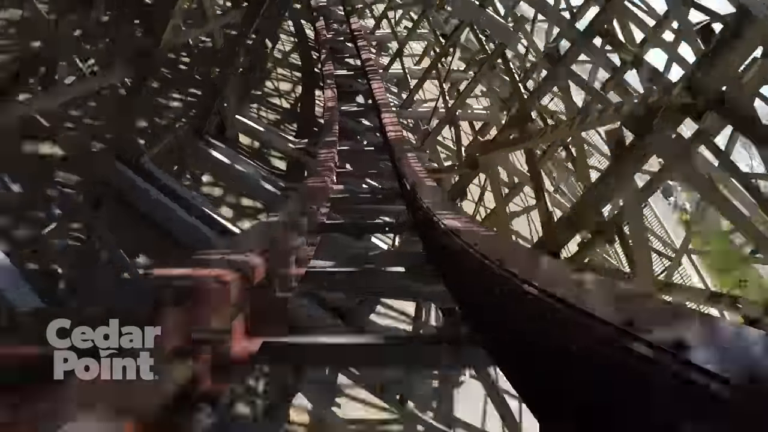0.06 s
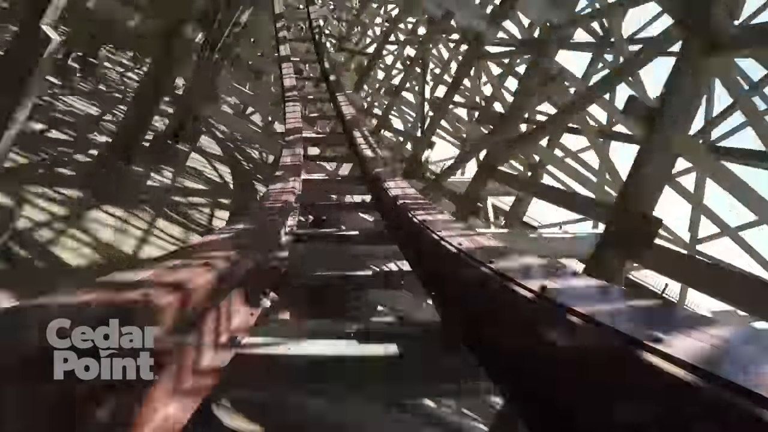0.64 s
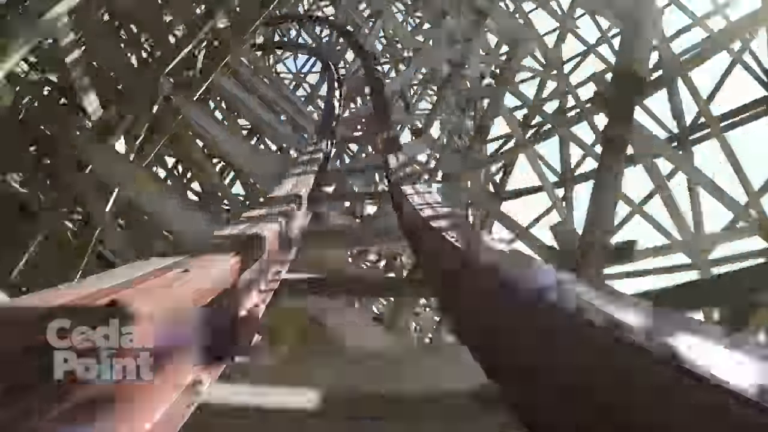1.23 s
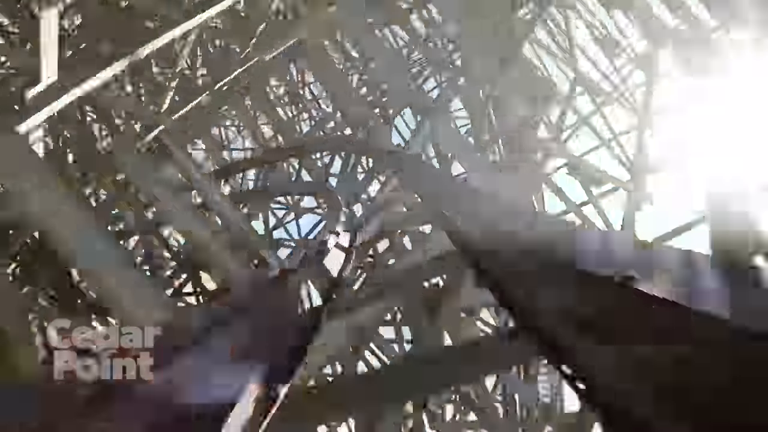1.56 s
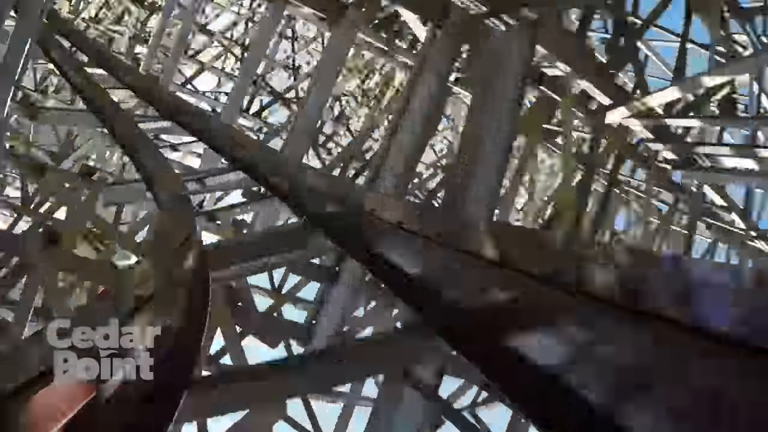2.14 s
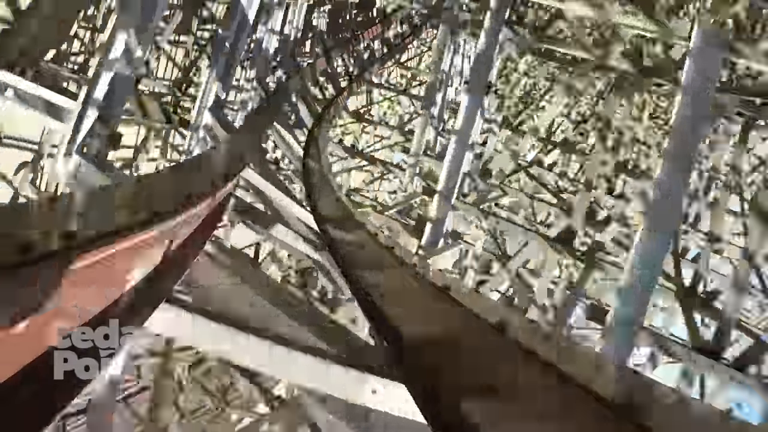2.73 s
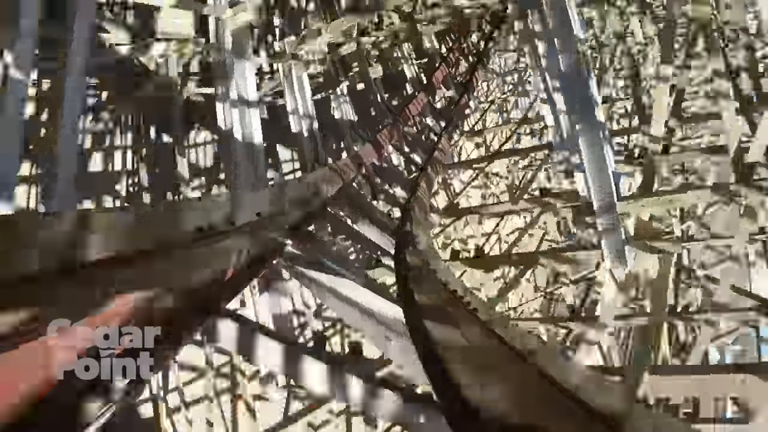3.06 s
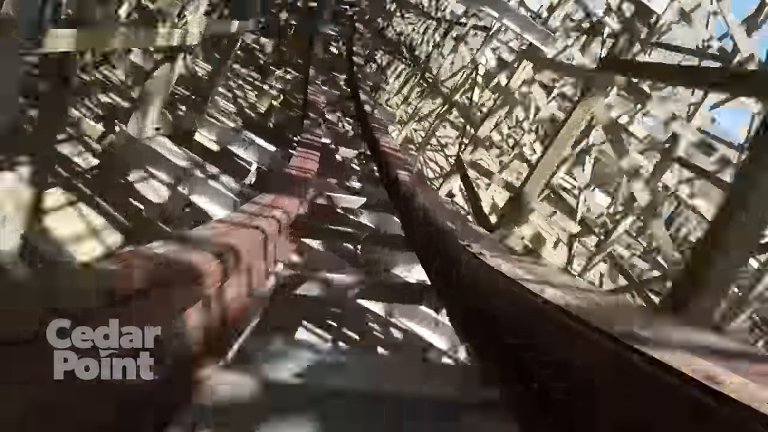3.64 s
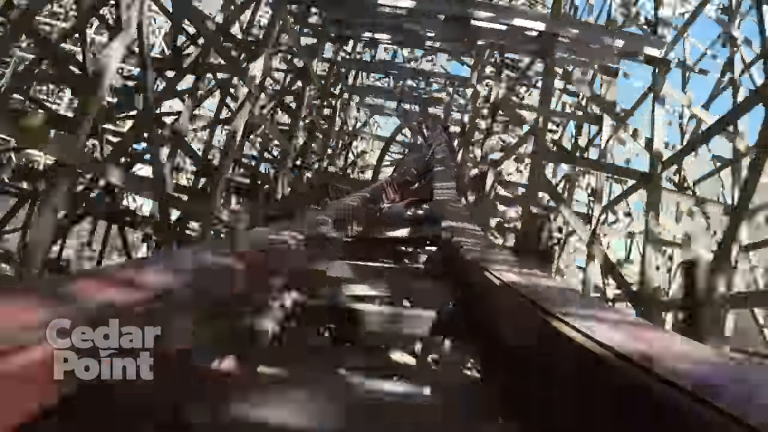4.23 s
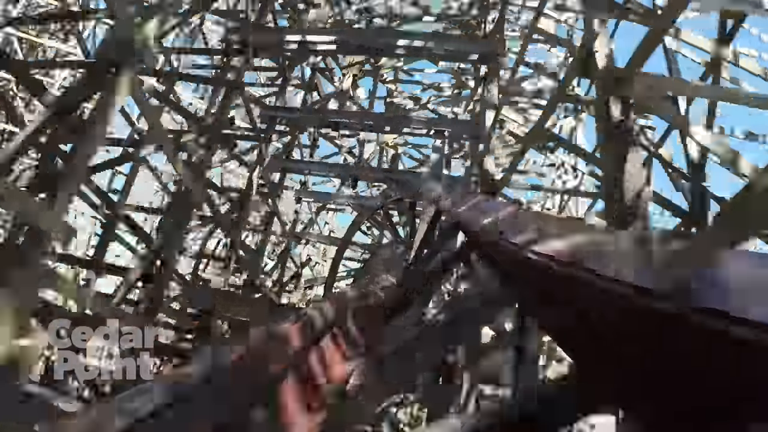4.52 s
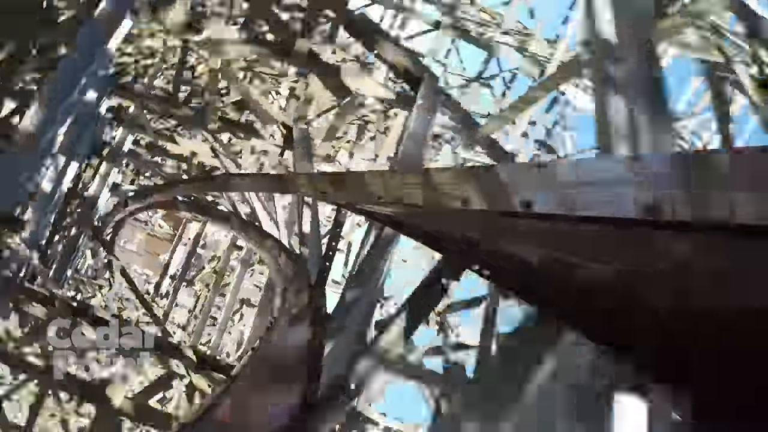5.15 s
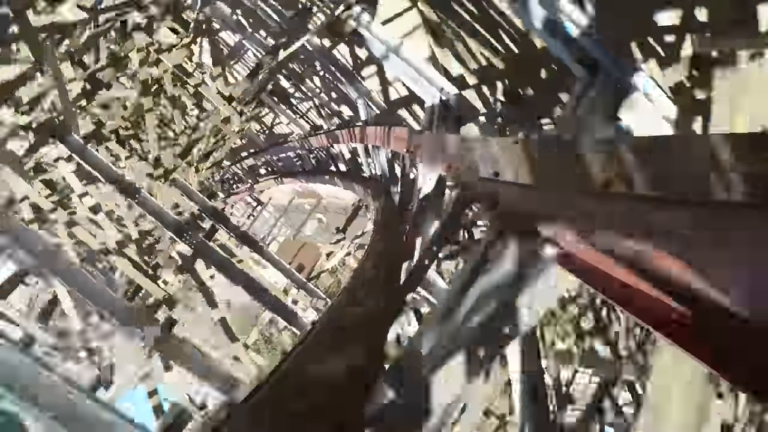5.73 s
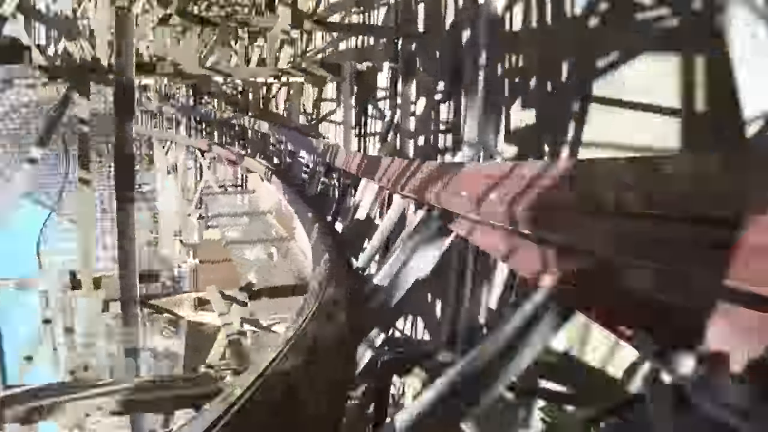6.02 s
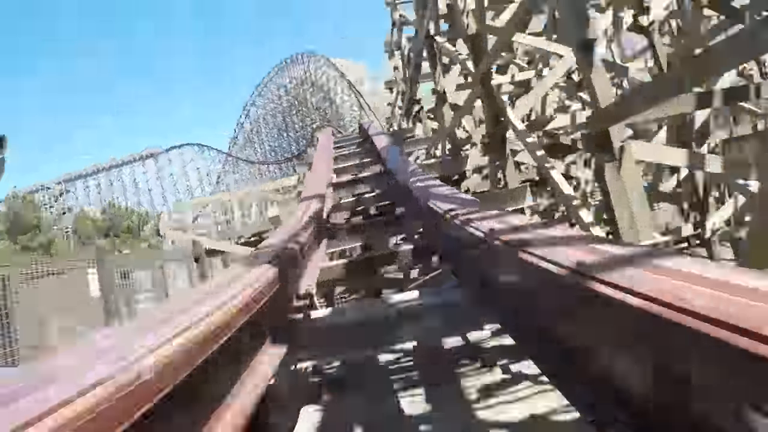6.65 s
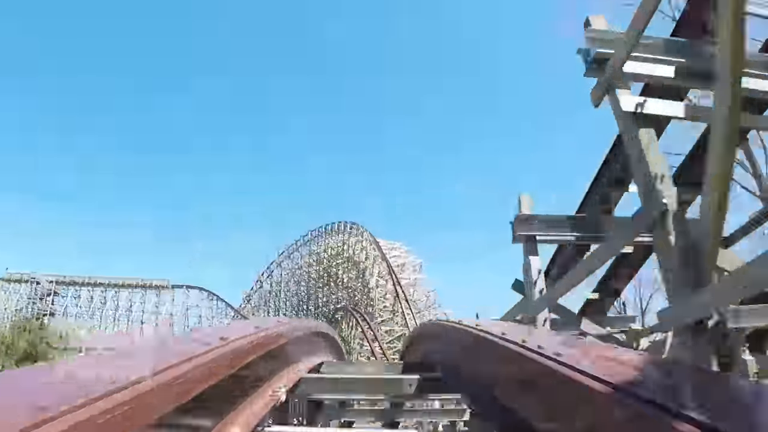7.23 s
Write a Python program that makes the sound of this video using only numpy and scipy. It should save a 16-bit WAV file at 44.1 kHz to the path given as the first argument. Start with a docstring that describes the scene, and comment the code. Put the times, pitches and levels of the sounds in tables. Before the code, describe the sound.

A roller coaster runs fast on steel rails outdoors, heard from the front car. A deep rumble, a rolling wheel roar and low wind buffeting continue at a fairly even level for all seven seconds or so, with a faint steel hiss above them. In the first second and a half, low bumps come in quick succession and loose fittings chatter lightly. Wind thumps the microphone between about 1.8 and 3 seconds, and again near 5 and 5.5. The car rattles and the wheels clack irregularly, with a strong jolt at 2.5 and more around 3.9, 4.6 and 5 seconds. Very short, rough squeaks and scrapes are scattered throughout. Knocks and a brief surge of roar come near 5.6, then a double clunk at 6.2. At 6.8 a hard clank rings with short, clean pings, and the roar eases slightly as the ride rolls on.

```python
"""A deep rumble and buffeting wind: a roller coaster on steel rails in a timber frame, from its front car.
Rail roughness drives the wheels, which roar through the chassis and hiss as they slide. Rough spots of
track set the car body rattling, bumps clunk, wheels clack and loose fittings chatter. The flanges give
short, rough squeaks, and near the end a hard clank rings with clean pings.
Eddies strike the microphone; a limiter holds the peaks."""
import sys
import numpy as np
from scipy import signal
from scipy.fft import rfft, irfft, next_fast_len
from scipy.io import wavfile
from scipy.ndimage import uniform_filter1d, minimum_filter1d, map_coordinates

SR = 44100
rng = np.random.default_rng(int(sys.argv[2]) if len(sys.argv) > 2 else 0)


def waveform_to_disk(signal):
    """Save audio, clipped to [-1, 1], as 16-bit WAV at the path in sys.argv[1]."""
    frames = np.transpose(np.atleast_2d(signal))
    scaled = np.clip(frames, -1, 1) * 32767
    samples = np.round(scaled).astype(np.int16)
    wavfile.write(sys.argv[1], SR, samples)


N = 321048

# modes of the car body: (frequency [Hz], bandwidth [Hz], level [dB])
BODY_MODES = [(540, 110, -9.5), (656.5, 57, 3), (751.5, 75, 0.5), (797.4, 43, 2.5), (1340, 260, -20.5),
              (1780, 270, -27.5), (2570, 130, -27), (3020, 170, -30.5)]
# modes of the steel wheels: (frequency [Hz], bandwidth [Hz], level [dB])
WHEEL_MODES = [(2520, 48, 0.5), (3070, 48, 2.5), (3430, 49, -8.5), (3820, 37, -4), (5000, 90, -9.5),
               (5504, 42, -12), (6140, 80, -16.5), (7496, 60, -23.5)]


def wheels(load_db, roar_db, shake):
    """Forced vibration: rail roughness drives a rumble and roar in the chassis and a body clatter."""
    # spectra of the chassis vibration: (frequency [Hz], level [dB])
    rumble_spectrum = [(50, -40), (100, -9.5), (150, -3.5), (240, 0), (340, -3), (520, -4.5), (700, -11.5),
                       (1000, -15.5), (3000, -79.5)]
    roar_spectrum = [(200, -26.5), (500, -5.5), (820, 4), (930, 0.5), (1150, 0.5), (1500, 1), (1850, -4),
                     (2150, -11), (2700, -20), (3600, -42.5), (7000, -67.5)]
    rumble = amp(load_db + 1.0 + 0.22 * wobble(16)) * coloured(turbulence(patchy_db=1), rumble_spectrum)
    roar_gain = amp(roar_db + 1.39 + 0.85 * shake + 0.52 * wobble(14))
    roar = roar_gain * coloured(turbulence(patchy_db=0.8), roar_spectrum)
    body_ring = resonate(impacts(rate=1400, spread_db=5), BODY_MODES)
    clatter = amp(roar_db + 0.5 + 1.5 * shake) * unit(soften(body_ring, corner_hz=2510))
    return rumble + roar + clatter


def boom(load_db, mean_db=-20, growth=0.65):
    """Mass-spring resonance: the chassis booms on its suspension, a little louder under load."""
    # spectrum of the sprung chassis: (frequency [Hz], level [dB])
    boom_spectrum = [(50, -29.5), (85, -5.5), (110, -3), (135, 0), (170, -1), (210, -8.5), (400, -46),
                     (1000, -100)]
    level_db = mean_db + growth * (load_db - load_db.mean())
    return amp(level_db + 0.62 * wobble(18)) * coloured(rng.standard_normal(N), boom_spectrum)


def wind(roar_db, air_db=-73.0, air_growth=.6):
    """Turbulent pressure: eddies flutter on the microphone, and a faint hiss of air follows the roar."""
    # strength of the gusts: (time [s], level [dB])
    gusts = [(0.0, -20), (0.1, -17.5), (2.13, -15), (2.41, -18.5), (2.84, -15.5), (5.76, -19),
             (5.92, -14.5), (6.47, -21.5), (6.51, -12), (6.57, -19.5), (6.69, -14.5), (7.12, -17.5),
             (7.14, -15), (7.28, -21)]
    # spectra of the buffeting and of the passing air: (frequency [Hz], level [dB])
    buffet_spectrum = [(5, -51.5), (14, -5), (23, -2.5), (45, -0.5), (75, -2), (110, -6), (200, -28.5),
                       (600, -66), (1500, -120)]
    air_spectrum = [(1500, -19.5), (5000, -1.5), (8500, -4.5), (11000, -4.5), (13300, -9), (14500, -20.5)]
    flutter_gain = amp(curve(gusts) + .5 + 0.97 * wobble(18))
    flutter = flutter_gain * coloured(rng.standard_normal(N), buffet_spectrum)
    air_gain = amp(air_db + air_growth * (roar_db - roar_db.mean()) + .5 * wobble(10))
    return flutter + air_gain * coloured(rng.standard_normal(N), air_spectrum)


def thumps(width_s=0.0056):
    """A vortex has a low-pressure core, so each passes the microphone as one dip of pressure."""
    # single eddies: (time [s], peak level [dB])
    eddies = [(1.803, -2.5), (1.912, -4.5), (2.021, -12), (2.19, -10.5), (2.251, -11), (2.283, -9),
              (2.503, -13), (2.652, -11), (2.693, -11.5), (2.992, -5), (4.975, -7), (5.543, -9),
              (5.65, -13)]
    u = np.arange(-SR // 25, SR // 25) / (SR * width_s)
    dip = (u ** 2 - 1) * np.exp(-u ** 2 / 2)
    out = np.zeros(N)
    for middle, db in eddies:
        out[round(middle * SR) - len(u) // 2:][:len(u)] += amp(db) * dip
    return out


def jolts(knock_rate=150, fade_s=0.01, ring_t60=0.068, scatter_octaves=.26, thud_hz=400, thud_s=0.0034):
    """Impact excitation: each jolt is a volley of knocks that thud and ring the body at varied pitch."""
    # rough spots of track: (time [s], level [dB], duration [s], pitch [ratio to the body's own])
    rough_spots = [(.528, -24.5, .09, .95), (1.005, -20, .024, 1), (1.07, -21, .04, .95),
                   (1.08, -19.5, .025, .45), (1.462, -15.5, .03, 1), (1.565, -21.5, .02, .95),
                   (1.871, -16.5, .024, .9), (2.526, -13.5, .036, .99), (2.612, -22, .04, .95),
                   (2.699, -17.3, .024, .98), (2.825, -20, .025, .95), (3.24, -21, .06, 1),
                   (3.41, -20.5, .03, .95), (3.845, -21, .03, .95), (3.882, -16, .03, 1),
                   (4.49, -20.5, .08, .9), (4.937, -16.5, .02, 1.04), (4.962, -13.8, .026, 1.04),
                   (5.499, -13, .012, 1.03), (5.531, -14, .026, 1.08), (5.61, -19, .02, 1),
                   (6.184, -15, .008, .97), (6.21, -14.2, .008, 1.04), (6.285, -19.5, .035, .42),
                   (6.508, -17, .025, .92), (6.802, -17, .016, 1.05), (6.92, -20.5, .03, .45),
                   (7.08, -21, .025, .95)]
    t = np.arange(SR // 25) / SR
    contact = soften(signal.unit_impulse(len(t)), corner_hz=2200)
    ring = unit(resonate(contact, BODY_MODES) * amp(-60 * t / ring_t60))
    thud = amp(-8) * unit(soften(np.sin(2 * np.pi * thud_hz * t) * np.exp(-t / thud_s), corner_hz=1200))
    out = np.zeros(N + SR)
    for start, db, length, pitch in rough_spots:
        volley = np.zeros(SR // 2)
        for k, (late, force, spot, ring_side, thud_side) in enumerate(rng.random(size=(24, 5))):
            delay = (k + late * min(k, 1)) / knock_rate
            size = amp(6 * force) * np.exp(-max(delay - length, 0) / fade_s)
            knock = np.sign(ring_side - .5) * ring + np.sign(thud_side - .5) * thud
            speed = pitch * 2 ** (scatter_octaves * (spot - .5))
            volley[round(delay * SR):][:len(t)] += size * np.interp(t * speed, t, knock)
        volley *= np.sqrt(SR * (length + fade_s / 2)) / np.linalg.norm(volley)  # rms near 1
        out[round(start * SR):][:len(volley)] += amp(db) * volley
    return out[:N]


def clunks(decay_cycles=1.1):
    """Heavily damped oscillation: a hard bump shoves the car once; the swing dies in a few cycles."""
    # hard bumps, the low ones from the chassis: (time [s], peak level [dB], frequency [Hz])
    bumps = [(.224, -9, 240), (.447, -9, 260), (.670, -7, 250), (.945, -6, 270), (1.028, -4, 230),
             (1.082, -8, 260), (1.098, -7, 220), (1.347, -5, 850), (1.483, -9, 280), (1.747, -4.5, 820),
             (1.891, -7, 640), (2.024, -7, 720), (2.085, -9, 280), (2.528, -3, 640), (4.487, -7, 300),
             (4.634, -3.5, 760), (4.868, -7, 240), (5.5, -5, 660), (5.898, -6, 700), (6.182, -3, 560),
             (6.209, -2, 830), (6.294, -8, 240), (6.531, -6, 760), (6.801, -1, 780), (6.926, -8, 300)]
    t = np.arange(SR // 20) / SR
    out = np.zeros(N)
    for start, db, hz in bumps:
        swing = soften(np.sin(2 * np.pi * hz * t) * np.exp(-hz * t / decay_cycles), corner_hz=4 * hz)
        out[round(start * SR):][:len(t)] += amp(db) * swing / np.abs(swing).max()
    return out


def clacks(t60=0.015, attack_s=.0004, crack_db=-9, ring_db=18):
    """Impact and free vibration: a wheel strikes the rail with a dry crack, then rings at its modes."""
    # blows of wheel on rail: (time [s], level [dB])
    strikes = [(1.0281, -28), (1.0815, -35), (1.468, -33), (1.7788, -35), (1.79, -36), (1.8, -35),
               (2.0234, -35), (2.5277, -28), (2.539, -33), (2.551, -35), (2.563, -37), (3.885, -32),
               (3.91, -35), (4.1, -33), (4.469, -33), (4.586, -28), (4.985, -29), (5.066, -34),
               (5.541, -32), (5.584, -31), (6.015, -29), (6.183, -29), (6.211, -33.5), (6.802, -26)]
    # spectrum of a dry steel contact: (frequency [Hz], level [dB])
    crack_spectrum = [(800, -20), (2000, -1), (3300, 4.5), (5000, -6), (7500, -19), (11000, -25),
                      (15000, -42)]
    t = np.arange(SR // 10) / SR
    blows = np.zeros(N)
    for start, db in strikes:
        blows[round(start * SR):][:len(t)] += amp(db - 60 * t / t60) * (1 - np.exp(-t / attack_s))
    crack = blows * coloured(rng.standard_normal(N), crack_spectrum)
    ring = soften(resonate(blows * rng.standard_normal(N), WHEEL_MODES), corner_hz=5000)
    return amp(crack_db) * crack + amp(ring_db) * ring


def steel_tones():
    """Brief resonance of steel: rough squeaks and scrapes, and the clean ringing pings of a clank."""
    # brief steel tones: (time [s], frequency [Hz], level [dB], duration [s], roughness [0-1])
    tones = [(.105, 4750, -44.5, .012, .2), (.408, 3330, -37.5, .016, .3), (.41, 7500, -65, .03, .8),
             (.43, 3910, -44.5, .07, .75), (.53, 7520, -64, .025, .7), (.642, 3400, -39, .02, .5),
             (.75, 5530, -55, .02, .5), (.928, 1880, -22, .008, .7), (.949, 1650, -24, .011, .8),
             (.95, 2080, -24.5, .009, .6), (.95, 6180, -60, .04, .9), (.968, 1380, -21, .028, .3),
             (1.412, 1450, -25, .012, .9), (1.643, 6850, -63, .015, .7), (1.667, 6250, -58, .014, .8),
             (2.54, 3130, -44, .018, .5), (2.56, 2600, -43, .025, .3), (3.23, 5060, -57.5, .08, 1),
             (4.4, 1890, -28, .035, .8), (5.438, 1450, -22, .008, .6), (5.46, 5000, -55, .08, .9),
             (5.589, 1440, -19, .008, .6), (5.6, 3200, -41, .04, 1), (5.72, 5520, -61, .1, .6),
             (6.124, 1550, -21, .01, 1), (6.805, 6160, -46.5, .008, .1), (6.808, 3130, -38, .01, .2),
             (6.812, 2590, -37, .015, .1), (6.82, 7220, -61, .016, .9), (6.855, 7130, -62, .013, .8)]
    t = np.arange(N) / SR
    jitter = (wobble(380) + 1j * wobble(380)) / np.sqrt(2)  # random amplitude and phase
    jitter *= unit(amp(4 * np.tanh(wobble(70))))
    out = np.zeros(N)
    for middle, hz, db, length, rough in tones:
        near = slice(max(round((middle - 2 * length) * SR), 0), round((middle + 2 * length) * SR))
        tone = (np.sqrt(1 - rough) + np.sqrt(rough) * jitter[near]) * np.exp(2j * np.pi * hz * t[near])
        out[near] += amp(db) * swell(t[near], middle, length) * unit(tone.real) / np.sqrt(2)
    return out


def scrub(roar_db, shake, base_db=-48.5, fade_db_per_s=0.1):
    """Sliding friction: the wheels hiss, crackle and ring with the roar, easing as the train slows."""
    # wheels pressed sideways scrape harder: (time [s], rise [dB], duration [s])
    scrapes = [(.5, 1, .3), (1.484, 4, .05), (2.042, 4.5, 0.15), (2.548, 3.5, 0.023), (3.92, 3.5, 0.046),
               (5.06, 5, 0.08), (6.02, 1, .02)]
    # spectrum of steel sliding on steel: (frequency [Hz], level [dB])
    hiss_spectrum = [(1200, -29), (2400, 2), (3150, 0.5), (3700, -5.5), (4400, -9.5), (5100, -13.5),
                     (6000, -20), (6900, -28.5), (9000, -33), (13000, -50.5), (15000, -59.5)]
    t = np.arange(N) / SR
    level_db = base_db + (roar_db - roar_db.mean()) - fade_db_per_s * t
    level_db += sum(db * swell(t, middle, length) for middle, db, length in scrapes)
    hiss = amp(level_db + 1.5) * coloured(turbulence(patchy_db=1.0), hiss_spectrum)
    grit = amp(level_db - 6.5) * coloured(impacts(rate=110, spread_db=12), hiss_spectrum)
    ring_gain = amp(level_db - 5.5 + 1.5 * wobble(9))
    ring = ring_gain * unit(soften(resonate(turbulence(patchy_db=4.0), WHEEL_MODES), corner_hz=6000))
    return (hiss + grit + ring) * amp(0.28 * shake)


def fittings():
    """Repeated impact: loose steel parts ring in flurries, most on the first, fastest stretch."""
    # modes of the fittings: (frequency [Hz], bandwidth [Hz], level [dB])
    fitting_modes = [(3080, 48, 0.5), (3390, 73, 0), (3920, 85, -1), (4290, 80, -9.5), (7270, 90, -26.5),
                     (7500, 90, -21)]
    # strength of their chatter: (time [s], level [dB])
    chatter = [(0, -62), (.3, -57), (.37, -49.5), (.62, -52.5), (.72, -56), (.95, -47.5), (1.12, -56),
               (1.42, -52), (1.9, -67), (7.28, -68.5)]
    flurries = amp(7 * np.tanh(wobble(32)))
    taps = impacts(rate=500, spread_db=6) * flurries
    return amp(curve(chatter)) * unit(soften(resonate(taps, fitting_modes), corner_hz=8000))


def impacts(rate, spread_db):
    """A Poisson process: little impulses of uneven size, on average rate a second."""
    hits = rng.random(N) < rate / SR
    return hits * rng.choice([-1, 1], N) * amp(spread_db * rng.uniform(-1, 1, N))


def turbulence(patchy_db):
    """Random modulation: white noise whose gain drifts in patches of time and frequency."""
    spectra = signal.stft(rng.standard_normal(N), nperseg=1024)[2]
    patches = uniform_filter1d(rng.standard_normal(spectra.shape), size=7, axis=0)
    patches = uniform_filter1d(patches, size=5, axis=1)
    return signal.istft(spectra * amp(patchy_db * unit(patches)), nperseg=1024)[1][:N]


def resonate(x, modes):
    """Modal superposition: x drives damped resonances of alternating sign."""
    return filtered(x, lambda f: sum(
        (-1) ** k * amp(db) * 1j * f * width / (hz * hz - f * f + 1j * f * width)
        for k, (hz, width, db) in enumerate(modes)))


def soften(x, corner_hz):
    """Contact compliance: a padded contact passes little above its corner frequency."""
    return filtered(x, lambda hz: 1 / (1 + 1j * hz / corner_hz) ** 2)


def coloured(x, spectrum):
    """Spectral shaping by (frequency [Hz], level [dB]) points on a log axis, scaled to rms 1."""
    points_hz, db = np.transpose(spectrum)
    return unit(filtered(x, lambda hz: amp(np.interp(np.log(hz + 1), np.log(points_hz), db))))


def filtered(x, response):
    """Linear filtering: the spectrum of x times a complex frequency response."""
    size = next_fast_len(len(x) + SR // 8)
    return irfft(rfft(x, size) * response(np.fft.rfftfreq(size, 1 / SR)), size)[:len(x)]


def wobble(rate):
    """Spline interpolation through random knots, rate a second."""
    knots = rng.standard_normal(int(N * rate / SR) + 4)
    coarse = np.linspace(0, N, N // 16)
    return np.interp(np.arange(N), coarse, map_coordinates(knots, [coarse * rate / SR]))


def swell(t, middle, length):
    """A Gaussian rise and fall of height 1."""
    return np.exp(-2 * ((t - middle) / length) ** 2)


def curve(points):
    """Linear interpolation of (time [s], level [dB]) points to every sample."""
    return np.interp(np.arange(N) / SR, *np.transpose(points))


def amp(db):
    """Decibels to gain."""
    return 10 ** (np.asarray(db) / 20)


def unit(x):
    """Scale to rms 1."""
    return x / np.sqrt(np.mean(x ** 2) + 1e-20)


def scene():
    """Superposition of sources near the microphone; rail unevenness moves roar and scrub together."""
    # wheel load, heard as rumble, and rolling roar of the rails: (time [s], level [dB])
    wheel_load = [(0.03, -17), (0.47, -16), (1.7, -18), (1.83, -16.5), (1.89, -19), (2.11, -18),
                  (2.21, -23.5), (3.62, -17.5), (4.92, -17), (5.0, -19.5), (6.72, -16.5), (7.2, -18)]
    rail_roar = [(0.03, -24), (0.91, -25), (0.95, -25), (1.0, -25.5), (1.8, -25.5), (2.12, -29.5),
                 (3.33, -25.5), (4.45, -23.5), (4.77, -26), (5.02, -24.5), (5.54, -25.5), (5.61, -20.5),
                 (5.66, -25.5), (6.1, -25), (6.12, -23.5), (6.16, -26), (6.89, -24.5), (7.25, -28)]
    load_db = curve(wheel_load)
    roar_db = curve(rail_roar) + .5 * wobble(16)  # unevenness of the rail
    shake = unit(wobble(25) + wobble(110))  # quick fluctuation of the wheel load
    rolling = wheels(load_db, roar_db, shake) + boom(load_db) + scrub(roar_db, shake)
    airflow = wind(roar_db) + thumps()
    return (rolling + airflow + jolts() + clunks() + clacks() + steel_tones() + fittings())[None]


def record(dry, ceiling=.92, top_hz=14300):
    """Peak and band limiting: the gain ducks under the highest peaks, and the top treble is cut."""
    needed_gain = ceiling / np.maximum(np.abs(dry[0]), ceiling)
    held_gain = minimum_filter1d(needed_gain, size=241)
    gain = uniform_filter1d(uniform_filter1d(held_gain, size=121), size=121)
    return filtered(dry[0] * gain, lambda hz: hz < top_hz)[None]


dry = scene()
out = record(dry)
waveform_to_disk(out)
```